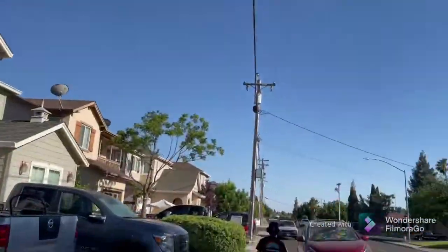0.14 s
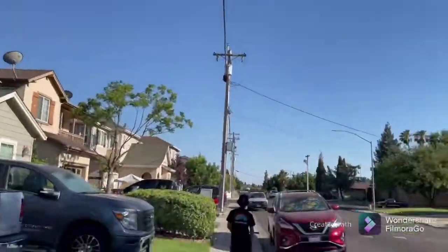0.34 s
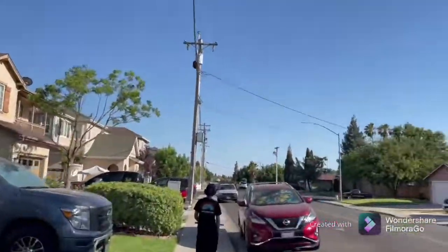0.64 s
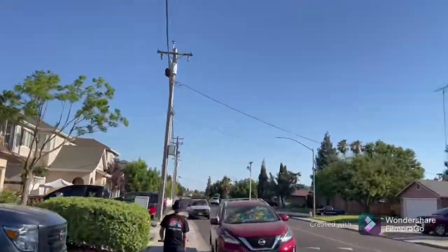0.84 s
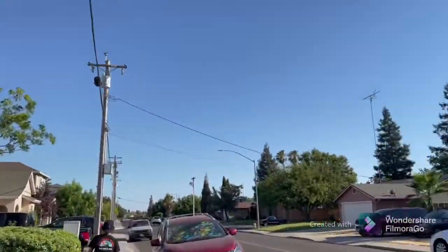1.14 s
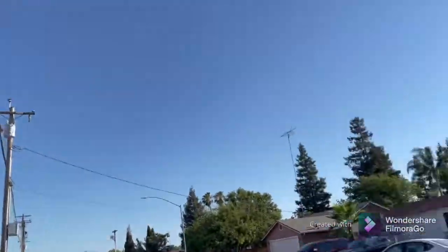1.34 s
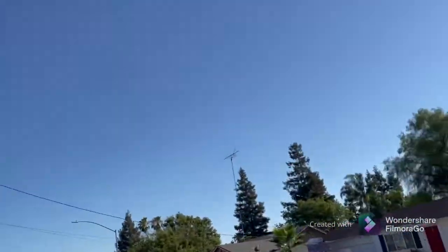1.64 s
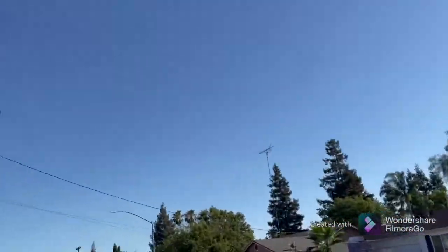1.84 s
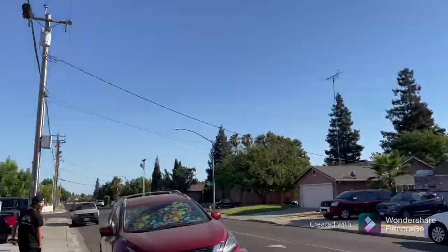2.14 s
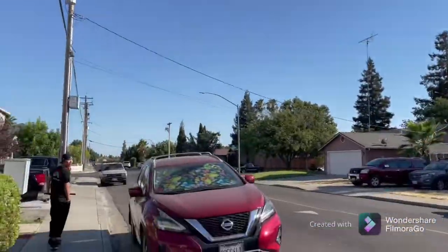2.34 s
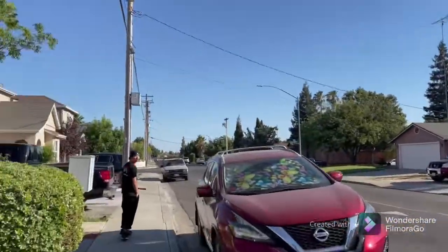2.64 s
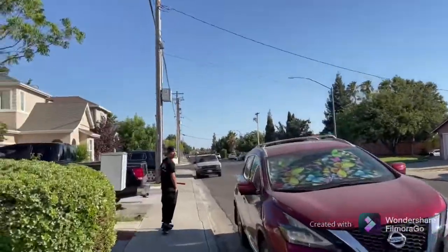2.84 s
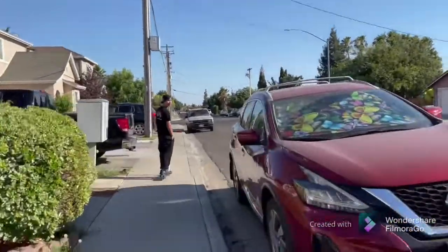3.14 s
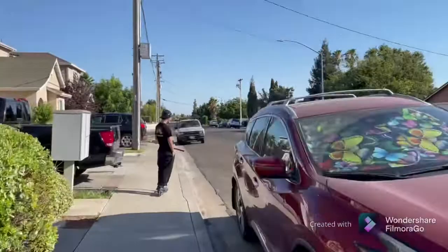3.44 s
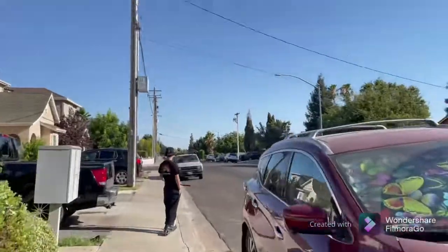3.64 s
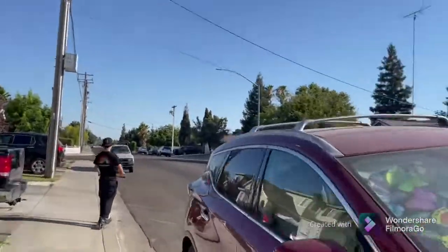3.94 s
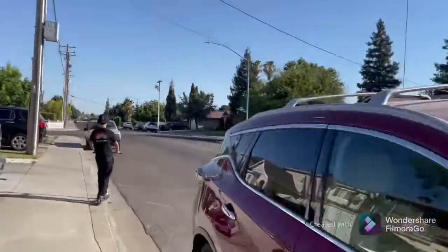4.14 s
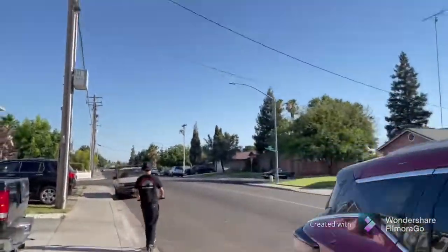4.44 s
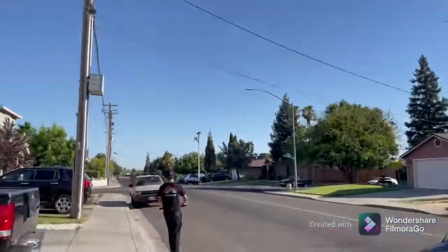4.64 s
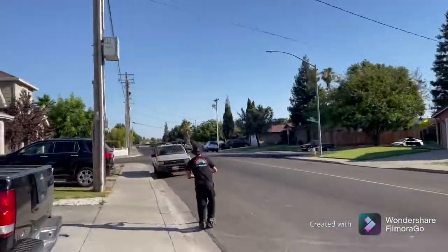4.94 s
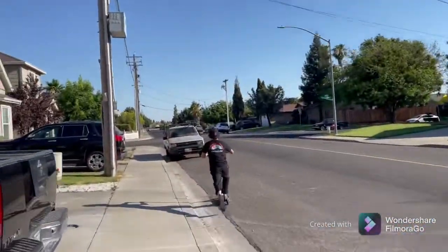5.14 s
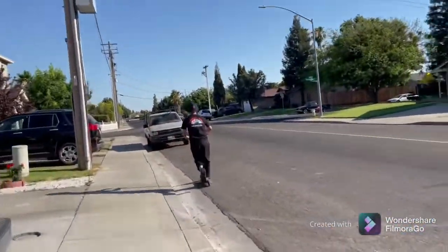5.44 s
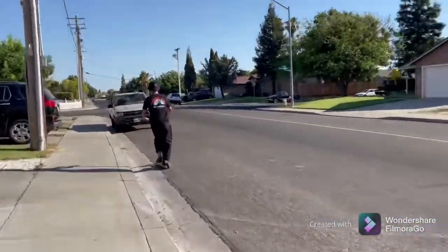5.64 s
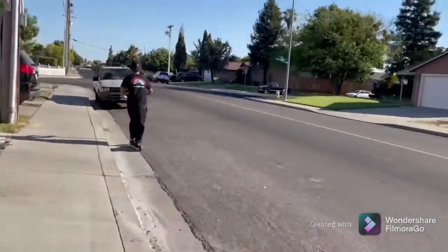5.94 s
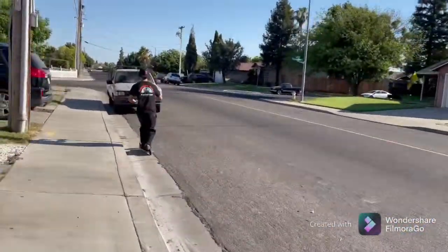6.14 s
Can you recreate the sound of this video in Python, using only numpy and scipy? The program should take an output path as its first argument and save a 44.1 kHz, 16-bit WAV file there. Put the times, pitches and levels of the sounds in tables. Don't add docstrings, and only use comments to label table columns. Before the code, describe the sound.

Outdoors on a residential street, a scooter's deck hums and grinds over concrete, heard close from a moving phone. Wheels knock loudly into joints with a short rebound, pebbles add lighter taps, and gusty wind thuds against the microphone. Faint dove coos appear only early on. Past the middle, a rapid metallic rattle precedes a hard clack, then brighter scraping, loose-part ticks and heavier knocks continue to an abrupt end.

```python
import sys
import numpy as np
from scipy import signal
from scipy.fft import rfft, irfft, next_fast_len
from scipy.io import wavfile
from scipy.ndimage import uniform_filter1d

SR = 44100
rng = np.random.default_rng(int(sys.argv[2]) if len(sys.argv) > 2 else 0)


def to_wav(sig):
    pcm = np.clip(np.atleast_2d(sig), -1, 1) * 32767
    pcm = np.round(pcm).astype(np.int16)
    wavfile.write(sys.argv[1], SR, pcm.T)


def makeup_ratio(level_db):
    decades = np.asarray(level_db, float) / 20
    return 10 ** decades


N = 277389

# time_s, speed_m_per_s
SPEED = [(0.0, 4.38), (1.45, 3.45), (2.2, 3.46), (2.6, 4.02), (4.2, 4.9), (6.29, 4.83)]
# frequency_hz, level_db_per_hz
CRACK = [(1800, -49), (2600, 9), (4000, 1.5), (5500, -1), (7000, -5), (10000, -10.5), (12000, -18),
         (16000, -19)]


def rolling():
    # time_s, level_db
    roll_level = [(0.0, -38.5), (0.65, -39), (1.49, -40.5), (2.12, -38.5), (2.49, -35), (2.77, -39.5),
                  (2.95, -35), (3.35, -35.5), (3.8, -36.5), (4.24, -37), (4.6, -31), (4.8, -36.5),
                  (5.08, -35.5), (5.45, -32), (5.64, -35.5), (5.81, -36), (6.13, -33.5), (6.29, -29)]
    edge_hz = 1900
    body_db = curve(roll_level)
    grit_db = body_db[0] - 15 + 0.67 * (body_db - body_db[0]) + 5 * speed_gain()

    grains = makeup_ratio(lumps(0.00093, N)) * rng.standard_normal((2, N))
    grains = blotched(grains, depth_db=2.5, hz=240, seconds=0.019)
    body = coloured(grains, lambda hz: deck_colour(hz) + share_above(edge_hz, hz))
    grit = coloured(grains, lambda hz: deck_colour(hz) + share_above(hz, edge_hz))
    return makeup_ratio(body_db) * body + makeup_ratio(grit_db) * grit


def deck_colour(hz):
    # frequency_hz, level_db_per_hz
    road_colour = [(100, -16), (250, 4), (500, 5), (900, 5.5), (1350, 0.5), (1900, -20.5), (2700, -28.5),
                   (3000, -32), (5300, -31.5), (6800, -41.5), (10000, -44.5), (12000, -52), (13500, -54.5),
                   (15700, -51)]
    # frequency_hz, width_hz, lift_db
    deck_modes = [(434, 28, 5), (656.2, 43, 9.5), (1150, 42, 6.5), (1728, 84, 7.5), (1920, 77, -11),
                  (2280, 173, 4), (2480, 91, 4), (2720, 67, 5.5), (3506, 360, 5), (3860, 89, 8),
                  (4050, 200, -1), (4750, 600, -1), (6320, 250, 2.5)]
    lift_db = sum(db / (1 + (2 * (hz - f) / width) ** 2) for f, width, db in deck_modes)
    return read(road_colour, hz) + lift_db


def patches():
    # start_s, worst_s, end_s, scrape_db, brightness_db
    rough_spots = [(1.596, 1.635, 1.754, -44, -56), (1.663, 1.803, 1.91, -55, -52),
                   (1.848, 1.994, 2.16, -50, -50), (2.465, 2.536, 2.58, -44, -45.5),
                   (2.358, 2.506, 2.85, -56, -42.5), (2.8, 2.938, 2.91, -35.5, -39),
                   (2.93, 2.978, 3.01, -34, -40), (2.985, 3.036, 3.075, -32.5, -39),
                   (3.713, 3.754, 3.77, -31, -41), (3.751, 3.791, 3.794, -29.5, -35),
                   (3.882, 3.898, 3.96, -43.5, -37), (4.025, 4.077, 4.5, -40.5, -57.5),
                   (4.424, 4.467, 4.49, -27, -37), (4.472, 4.533, 4.54, -30, -29.5),
                   (4.594, 4.622, 4.68, -40.5, -52), (5.303, 5.434, 5.51, -31.5, -36.5),
                   (5.435, 5.533, 5.55, -33, -38), (5.796, 5.915, 5.91, -37.5, -39),
                   (5.91, 6.007, 6, -35.5, -37.5), (6.011, 6.094, 6.24, -35.5, -33)]
    # frequency_hz, width_hz, level_db
    scrape_modes = [(1173, 59, 8.5), (1392, 75, 14), (1800, 40, 11.5), (2135, 93, 1), (2434, 75, -4),
                    (2620, 50, -12.5), (3300, 160, -18)]

    def scrape_colour(hz):
        return 10 * np.log10(sum(makeup_ratio(2 * db) / (1 + (2 * (hz - f) / width) ** 2)
                                 for f, width, db in scrape_modes))

    def fizz_colour(hz):
        shelves_db = 1.8 * (hz > 3400) * (hz < 4050) - 10.6 * (hz > 5300) - 1.5 * (hz > 8500)
        return deck_colour(hz) + share_above(hz, 2070) + shelves_db

    t = np.arange(N) / SR
    grains = makeup_ratio(2.0 * lumps(0.004, N)) * rng.standard_normal((2, N))
    grains = blotched(grains, depth_db=3.0, hz=400, seconds=0.012)
    rung = coloured(grains, scrape_colour)
    fizz = coloured(grains, fizz_colour)

    scrape, bright = np.zeros((2, N))
    for start, worst, end, scrape_db, bright_db in rough_spots:
        on = np.clip(np.minimum(t - start, end - t) / 0.0087, 0, 1)
        away = np.interp(t, (start, worst, end), (1, 0, 1)) ** 2
        scrape = scrape + on * makeup_ratio(scrape_db + away * np.where(t < worst, -21, -16.5))
        bright = bright + on * makeup_ratio(bright_db + away * np.where(t < worst, -13, -16.5))
    return makeup_ratio(-3.0) * scrape * rung + makeup_ratio(-11.0) * bright * fizz


def clacks():
    # time_s, blow_db, thud_db against the blow, main_ring_hz, rebound_db against the blow
    slab_joints = [(0.1205, -13, -4.5, 810, -10.5), (0.909, -13, -3.5, 1080, -16),
                   (1.4446, -12.5, -6, 880, -10.5), (2.334, -16.5, -7.5, 1180, -8.5),
                   (3.128, -12, -7, 1160, -12), (3.8753, -7, -9.5, 1470, -8.5),
                   (4.2657, -8, -47, 1226, -13.5), (4.601, -14, -9, 726, -12),
                   (5.148, -15, -5, 1150, -14.5), (5.571, -5.5, -5, 1254, -17),
                   (6.238, -11.5, -5, 710, -16.5)]
    # time_s, blow_db, thud_db and crack_db against the blow
    small_bumps = [(0.451, -28.5, -12, -21), (0.705, -23, -9.5, -21.5), (0.718, -29.5, -10, -24),
                   (0.89, -36, -20.5, -11), (1.139, -33, -12, -23), (1.241, -28, -29, -23),
                   (1.504, -40, 4, -6.5), (1.744, -30, -6.5, -23), (2.041, -32, -22, -25),
                   (2.145, -21.5, -22, -20.5), (2.231, -32, -2, -27), (2.387, -30, -18, -25.5),
                   (2.857, -38.5, -26, -23), (3.107, -19.5, -18, -16.5), (3.277, -29, -10, -12.5),
                   (3.616, -23, -9, -18), (3.685, -13.5, -32, -25), (4.17, -33, -8, -22),
                   (4.211, -23, 3, -36), (4.248, -31, -5, -14), (4.286, -31.5, 2, -18),
                   (4.466, -19, -31, -26), (4.546, -16, -14, -24), (4.628, -24, -5, -17),
                   (4.705, -33.5, 9.5, -27), (4.989, -24, -3.5, -34), (5.03, -25, -4, -22),
                   (5.429, -22.5, -13, -25), (5.891, -26, -9, -30), (5.966, -20.5, -4.5, -21),
                   (6.046, -34, 5.5, -24), (6.059, -27.5, 11.5, -32), (6.072, -35, 5.5, -19),
                   (6.091, -28.5, 8, -23), (6.111, -26.5, 2, -10)]
    lead_s, rebound_s, rebound_thud_db = 0.001332, 0.012, 6.5
    joint = dict(crack_db=-15.5, contact=0.0085, rise=0.0018)
    bump = dict(contact=0.004, rise=0.00034)

    out = np.zeros((2, N))
    for s, blow_db, thud_db, ring_hz, rebound_db in slab_joints:
        drop_in = clack(blow_db, thud_db, ring_hz=ring_hz, **joint)
        rebound = clack(blow_db + rebound_db, thud_db + rebound_thud_db, ring_hz=ring_hz, **joint)
        add(out, s - lead_s, drop_in)
        add(out, s + rebound_s, rebound)
    for s, blow_db, thud_db, crack_db in small_bumps:
        add(out, s, clack(blow_db, thud_db, crack_db, ring_hz=rng.uniform(680, 1430), **bump))
    return out


def clack(knock_db, thud_db, crack_db, ring_hz, contact, rise):
    # frequency_hz, level_db, t60_s
    thud_modes = [(125, -21.5, 0.03), (264, 4, 0.023), (418.4, -6.5, 0.05), (490, -25, 0.17)]
    # frequency_hz, level_db, t60_s
    knock_modes = [(720, -2, 0.02), (880, -2, 0.014), (990, 6, 0.0069), (1185, 9, 0.01),
                   (1348, -2.5, 0.024), (1710, 2.5, 0.008), (2035, 3.5, 0.0062), (2304, -7.5, 0.022),
                   (2586, -5.5, 0.013), (2720, -19, 0.012), (3860, -6.5, 0.014)]
    t = np.arange(6000) / SR
    hits = chatter(t, contact, scatter=0.34, rise=rise)

    shove = 14 * np.diff(np.exp(-((t - 0.0035) / 0.00074) ** 2), prepend=0)
    push = shove + 0.15 * hits[0] + 0.051 * hits
    thud = signal.fftconvolve(push, ring(thud_modes, t)[None], axes=1)

    spot = rng.uniform(-0.79, 1, (len(knock_modes), 3))
    struck = np.array(knock_modes) * (1 + np.array([0.042, 0, 0]) * spot) + np.array([0, 4, 0]) * spot
    modes = list(struck) + [(ring_hz, 0.1, 0.02)]
    knock = signal.fftconvolve(hits, ring(modes, t)[None], axes=1)

    def crack_colour(hz):
        return read(CRACK, hz) + 2.0 * np.cos(hz / 237.6 + 3 * spot[0, 2])

    crack = peaked(coloured(hits, crack_colour), knock_db + crack_db)
    body = peaked(thud, knock_db + thud_db) + peaked(knock, knock_db - 8.0)
    return body[:, :len(t)] + crack


def chatter(t, contact, scatter, rise=0.00045):
    noise, sizes = rng.standard_normal((2, 2, len(t)))
    onset = 1 - np.exp(-(t / rise) ** 2)
    force = onset * (np.exp(-(t / contact) ** 2 / 2) + scatter * np.exp(-t / 0.027))
    return force * noise * makeup_ratio(3.4 * sizes[0])


def rattle():
    # time_s, ring_db, crack_db, main_ring_hz, contact_s
    strikes = [
        (3.6805, -18, -30.5, 1610, 0.0043),
        (3.6933, -12, -20.5, 1560, 0.0071),
        (3.7008, -24, -24, 1530, 0.0093),
        (3.7088, -18, -26.5, 1130, 0.0012),
        (3.7146, -18, -32, 1630, 0.0021),
        (3.7205, -15.5, -30.5, 1380, 0.0025),
        (3.728, -45, -29, 1370, 0.0068),
    ]
    # frequency_hz, level_db, t60_s
    fork_modes = [(1600, -2, 0.021), (1530, 9, 0.016), (1580, 7, 0.017), (1720, 5, 0.0082),
                  (2070, 8.5, 0.012), (2200, 2.5, 0.016), (4230, -2, 0.017), (1080, -1, .008),
                  (2430, -15, 0.0064), (3450, -4, .01)]
    out, t = np.zeros((2, N)), np.arange(3000) / SR
    for s, ring_db, crack_db, ring_hz, contact in strikes:
        stem_hz = 637 + 6200 * (s - strikes[0][0])
        modes = fork_modes + [(ring_hz, 0.1, 0.02), (stem_hz, 7.5, 0.03)]
        hits = chatter(t, min(contact, 0.005), scatter=0.032)
        rung = signal.fftconvolve(hits, ring(modes, t)[None], axes=1)
        add(out, s, peaked(rung, ring_db + 0.5))
        scuff = chatter(t, 0.012, scatter=0.19)
        hiss = coloured(scuff, lambda hz: read(CRACK, hz) - 6.9 * (hz < 4000))
        add(out, s, peaked(hiss, crack_db - 6.0))
    return out


def ticks():
    # time_s, lower_ring_db, upper_ring_db, snap_db, pitch_ratio
    part_ticks = [(3.094, -55, -56, -59, 1.001), (3.2784, -41, -45, -50, 1.001),
                  (4.216, -57, -57, -40.5, 1.3), (4.224, -38, -59, -44, 0.86), (4.2893, -55, -43, -35, 1.2),
                  (4.4447, -29.5, -29.5, -46, 1), (4.5978, -55, -35, -36.5, 0.96),
                  (4.8433, -21, -33, -35, 1.025), (4.9394, -29.5, -56.5, -39.5, 1),
                  (5.008, -29, -51, -41.5, 1.05), (5.1644, -26.5, -36.5, -45.5, 1.03),
                  (5.309, -29, -44, -54.5, 1.08), (5.4255, -39, -37, -45, 1.08),
                  (5.719, -34.5, -52, -57, 1.03), (6.037, -60, -60, -51, 1), (6.05, -60, -60, -47, 1),
                  (6.118, -60, -60, -46, 1)]
    # frequency_hz, level_db, t60_s
    part_modes = [
        [(3790, -1, 0.019), (4050, -13.5, 0.028)],
        [(5100, 0, 0.022)],
    ]
    out, t = np.zeros((2, N)), np.arange(2048) / SR
    onset = 1 - np.exp(-t / 0.00072)
    for s, low_db, high_db, snap_db, pitch in part_ticks:
        for modes, db in zip(part_modes, (low_db, high_db)):
            tone = np.tile(ring(modes, t * pitch) * onset, (2, 1))
            add(out, s, peaked(tone, db - 13.0))
        snap = rng.standard_normal((2, len(t))) * np.exp(-t / 0.0034)
        snap = coloured(snap, lambda hz: read(CRACK, hz * 0.5))
        add(out, s, peaked(snap, snap_db - 6.0))
    return out


def wind():
    # time_s, level_db
    breeze_level = [(0.0, -27), (0.57, -39), (0.64, -36), (1.0, -34.5), (1.55, -24), (1.95, -34.5),
                    (2.19, -22), (2.85, -26.5), (3.35, -36.5), (3.82, -32.5), (4.0, -25), (4.36, -47),
                    (4.49, -22), (4.68, -26), (4.95, -37.5), (5.5, -35), (5.9, -26), (6.29, -22.5)]
    # peak_s, dying_s, buffet_db, roar_db against the buffet
    gust_events = [(0.069, 0.023, -17, -37), (.22, 0.032, -27, -29), (.39, 0.043, -32.5, -24),
                   (0.714, 0.068, -19.5, -30), (.94, 0.12, -30, -9.5), (1.11, 0.12, -27.5, -24),
                   (1.24, 0.035, -15, -17.5), (1.45, 0.017, -22, -27), (1.646, 0.04, -19, -9.5),
                   (1.736, 0.046, -12.5, -18.5), (1.82, 0.043, -20.5, -17), (1.89, 0.016, -23, -23),
                   (2.22, 0.012, -17.5, -31), (2.294, 0.045, -13, -15.5), (2.42, 0.12, -19, -32),
                   (2.5, 0.1, -25, -22), (2.69, 0.067, -14, -22.5), (2.748, 0.033, -18.5, -34),
                   (3.25, 0.094, -34, -2), (3.54, 0.048, -31, -5), (3.64, 0.061, -24.5, -4),
                   (4.103, 0.085, -22.5, -5.5), (4.221, 0.062, -20, 0.5), (4.554, 0.026, -16, -2),
                   (4.732, 0.044, -17.5, -18), (4.87, 0.013, -24.5, -8.5), (5.01, 0.051, -26, -13.5),
                   (5.61, 0.023, -44, -4), (5.828, 0.021, -20, -6.5), (6.059, 0.045, -18, -1.5)]
    # frequency_hz, level_db_per_hz
    buffet_colour = [(20, -66), (35, -1.5), (55, 1), (90, -0.5), (130, -5), (200, -14.5)]
    # frequency_hz, level_db_per_hz
    roar_colour = [(90, -9), (140, -3.5), (250, -6.5), (400, -9), (700, -19)]
    rise_s = 0.017

    t = np.arange(N) / SR
    buffet_power = makeup_ratio(2 * curve(breeze_level))
    roar_power = buffet_power * makeup_ratio(2 * (-12.5 + 11 * speed_gain()))
    for s, dying, db, roar_db in gust_events:
        gust = makeup_ratio(2 * db) * np.exp(-2 * ((t - s) / np.where(t < s, rise_s, dying)) ** 2)
        buffet_power = buffet_power + gust
        roar_power = roar_power + makeup_ratio(2 * roar_db) * gust

    eddies = makeup_ratio(2.3 * lumps(0.031, N)) * rng.standard_normal((2, 2, N))
    buffet = coloured(eddies[0], lambda hz: read(buffet_colour, hz))
    roar = coloured(eddies[1], lambda hz: read(roar_colour, hz))
    return makeup_ratio(-4.5) * np.sqrt(buffet_power) * buffet + makeup_ratio(-0.9) * np.sqrt(roar_power) * roar


def dove():
    # start_s, end_s, pitch_hz, level_db
    coo_events = [
        (.22, 0.304, 490, -45),
        (.81, 1.004, 468, -48),
        (1.15, 1.386, 476, -40),
    ]
    out = np.zeros((2, N))
    for start, end, hz, db in coo_events:
        u = np.linspace(0, 1, int((end - start) * SR))
        turns = np.cumsum(hz * (1.02 - 0.055 * u)) / SR
        side = np.array([[0], [2.2]])
        coo = np.sin(2 * np.pi * turns - side) * signal.windows.tukey(len(u), 0.4)
        add(out, start, makeup_ratio(db) * coo)
    return out


def ports(x):
    # frequency_hz, left_lead_rad, likeness_0_to_1, left_minus_right_db
    port_pair = [(60, 0, .78, -.6), (300, 0, .35, .3), (500, .5, .42, .5), (1200, .5, .88, -3),
                 (1600, .6, .88, -5), (2200, .2, .75, -3.5), (3300, 1., .65, -3), (4000, .4, .6, -3),
                 (5000, 1.6, .45, -2.5), (6400, 5.7, .6, -2), (7100, 4.4, .5, 0), (7600, np.pi, 1, 0),
                 (8900, np.pi, 1, 0), (9700, 1.9, .5, 0), (10700, 0, 1, 0), (12400, 0, 1, 0),
                 (13200, -1.5, .4, 0), (13900, -np.pi, 1, 0), (16000, -np.pi, 1, 0)]
    margin = 2048
    x = np.pad(x, ((0, 0), (margin, margin)), "reflect")
    size = next_fast_len(x.shape[1])
    hz = np.fft.rfftfreq(size, 1 / SR)
    f, *columns = np.transpose(port_pair)
    lead, like, balance_db = (np.interp(hz, f, column) for column in columns)
    left, other = rfft(x, size)
    right = like * np.exp(-1j * lead) * left + np.sqrt(1 - like ** 2) * other
    dip = makeup_ratio(-4.5 * np.exp(-((hz - 8400) / 900) ** 4))
    tilt = makeup_ratio(balance_db / 2)
    return irfft(dip * np.array([left * tilt, right / tilt]), size)[:, margin:margin + N]


def curve(rows):
    return np.interp(np.arange(N) / SR, *np.transpose(rows))


def speed_gain():
    return curve(SPEED) - SPEED[0][1]


def evened(x):
    return x / np.sqrt(np.mean(x ** 2) + 1e-20)


def read(points, hz):
    f, db = np.transpose(points)
    return np.interp(np.log(hz + 1), np.log(f + 1), db, left=-90, right=-90)


def coloured(x, db_of_hz):
    size = next_fast_len(x.shape[-1])
    gain = makeup_ratio(db_of_hz(np.fft.rfftfreq(size, 1 / SR)))
    return evened(irfft(rfft(x, size) * gain, size)[..., :x.shape[-1]])


def share_above(hz, edge_hz):
    return -10 * np.log10(1 + ((edge_hz + 1) / (hz + 1)) ** 24)


def lumps(seconds, shape):
    size = int(seconds * SR) + 1
    once = uniform_filter1d(rng.standard_normal(shape), size)
    return evened(uniform_filter1d(once, size))


def blotched(x, depth_db, hz, seconds):
    z = signal.stft(x, nperseg=256, noverlap=192)[2]
    field = rng.standard_normal(z.shape[1:])
    for _ in range(2):
        field = uniform_filter1d(field, int(hz * 256 / SR) + 1, axis=0)
        field = uniform_filter1d(field, int(seconds * SR / 64) + 1, axis=1)
    swollen = signal.istft(z * makeup_ratio(depth_db * evened(field)), nperseg=256, noverlap=192)[1]
    return evened(swollen[:, :x.shape[1]])


def ring(modes, t):
    return sum(makeup_ratio(db - 60 * t / t60) * np.sin(2 * np.pi * hz * t) for hz, db, t60 in modes)


def peaked(x, db):
    return makeup_ratio(db) * x / np.sqrt(uniform_filter1d((x ** 2).mean(0), size=220).max())


def add(mix, s, sound):
    part = mix[:, round(s * SR):][:, :sound.shape[1]]
    fade = np.clip(np.linspace(3, -1, sound.shape[1]), 0, 1)
    part += (sound * fade)[:, :part.shape[1]]


def scene():
    tick = ticks()
    hits = clacks() + rattle()
    hand = signal.butter(8, 13600, fs=SR, output="sos")
    direct = makeup_ratio(2.5) * tick + makeup_ratio(-18.5) * signal.sosfilt(hand, hits[0])
    near = rolling() + patches() + hits + tick + wind()
    return ports(near) + direct + dove()


def top_cut(x):
    return signal.sosfilt(signal.butter(12, 15780, fs=SR, output="sos"), x)


def record(dry):
    bass_cut = signal.butter(4, 42, "high", fs=SR, output="sos")
    band = signal.firwin(511, 15750, window=("kaiser", 9), fs=SR)
    mix = signal.oaconvolve(signal.sosfilt(bass_cut, dry), band[None], "same")
    mix = mix / (1 + (mix / 0.92) ** 6) ** (1 / 6)
    mix = mix * np.minimum(np.arange(N)[::-1] / 200, 1)
    return top_cut(mix)


dry = scene()
out = record(dry)
to_wav(out)
```